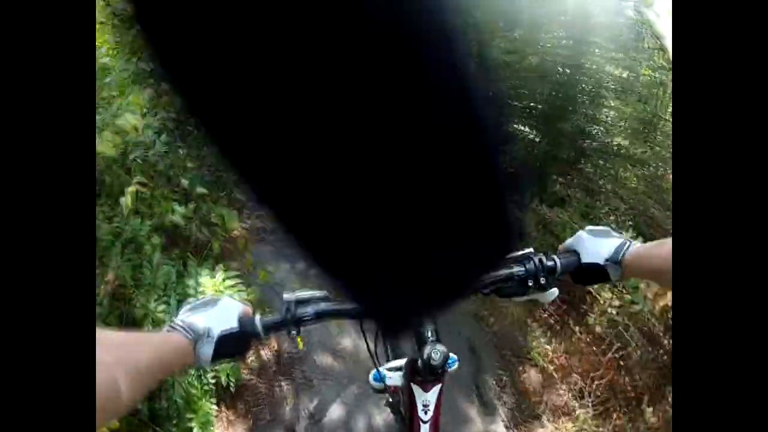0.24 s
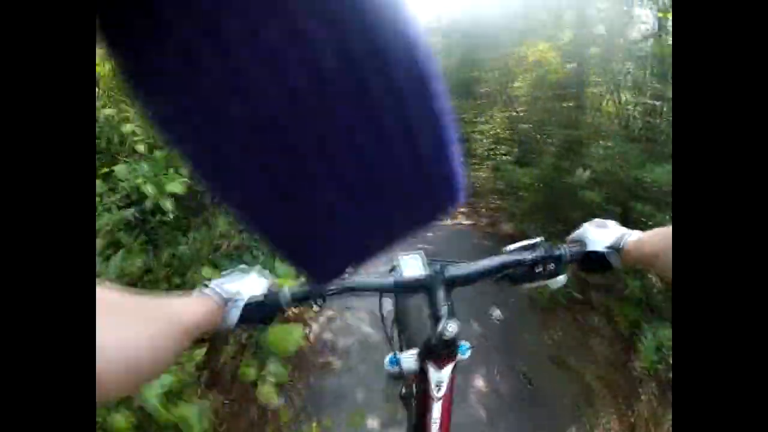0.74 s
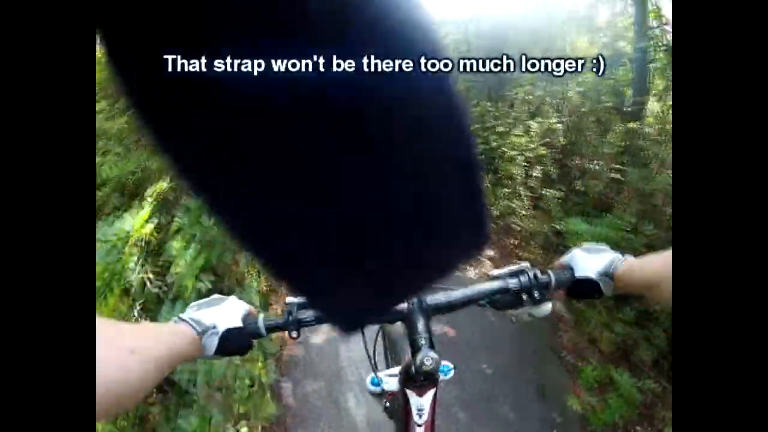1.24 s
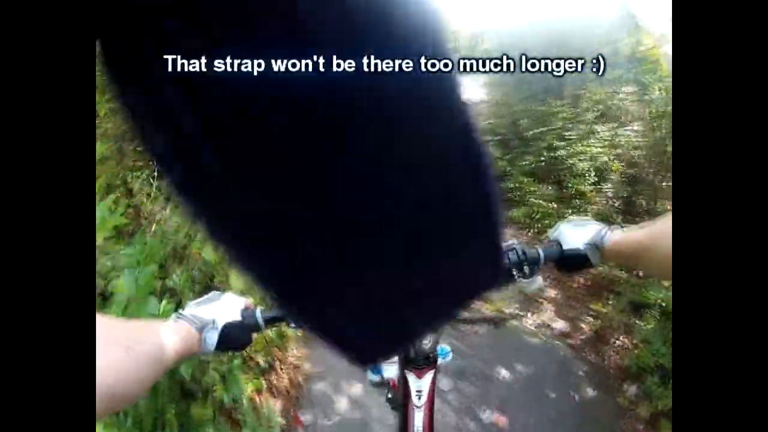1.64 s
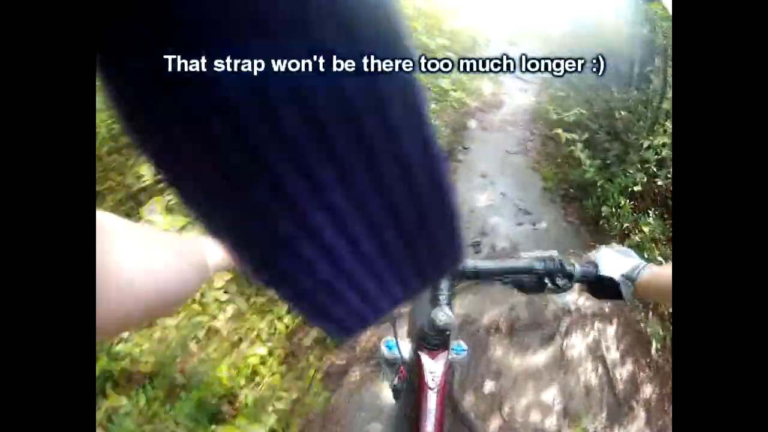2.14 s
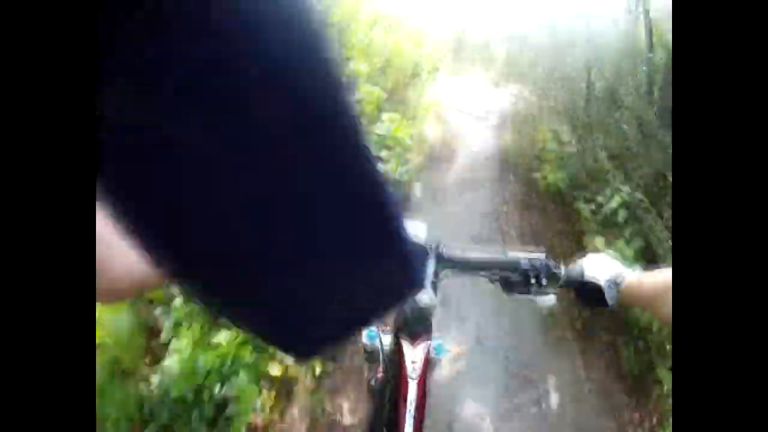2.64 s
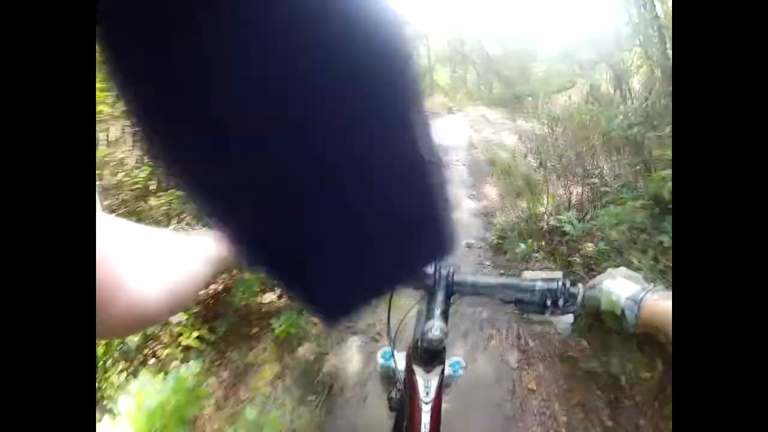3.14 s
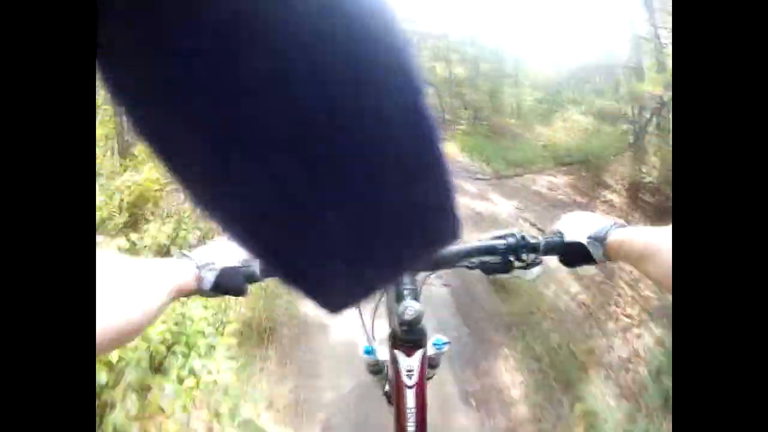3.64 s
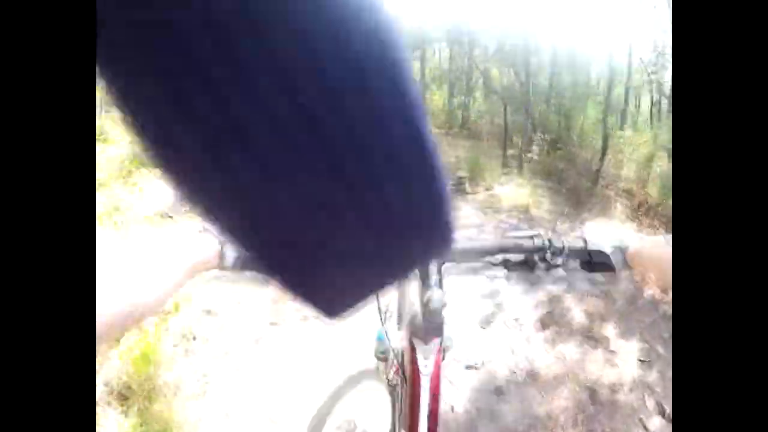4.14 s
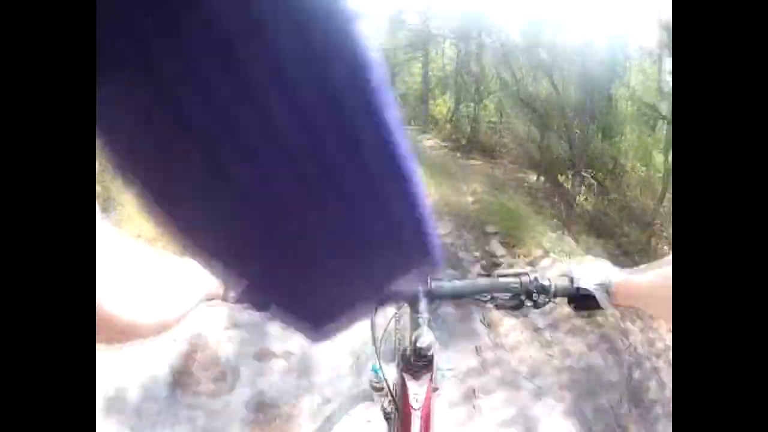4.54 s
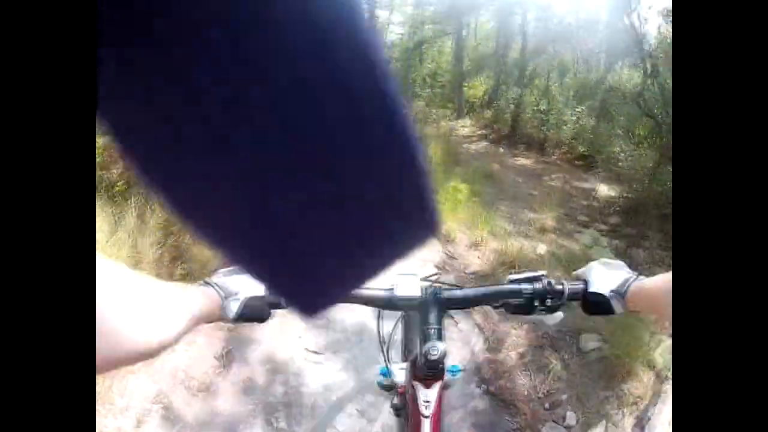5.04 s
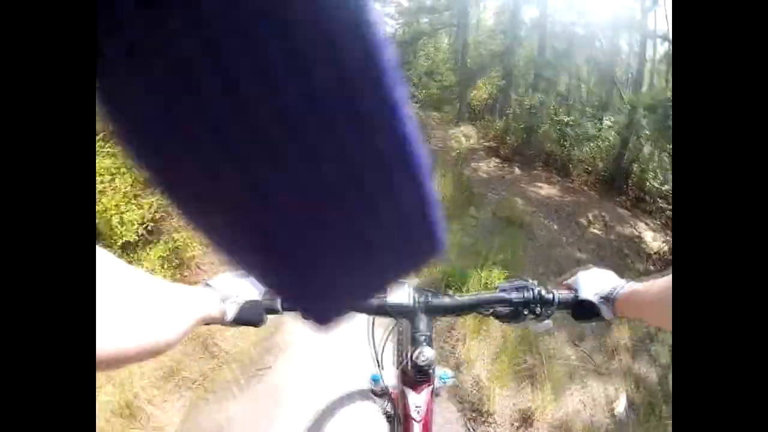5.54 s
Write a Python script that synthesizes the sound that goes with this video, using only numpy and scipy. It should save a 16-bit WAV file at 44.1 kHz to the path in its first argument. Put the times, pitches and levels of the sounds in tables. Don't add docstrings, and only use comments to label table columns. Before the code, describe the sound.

Low tyre rumble and gritty gravel noise under bursts of boxy, overloaded clacks and thuds as a mountain bike jolts downhill.

```python
import sys
import numpy as np
from scipy import signal
from scipy.fft import rfft, irfft
from scipy.io import wavfile
from scipy.ndimage import uniform_filter1d

SR = 44100
rng = np.random.default_rng(int(sys.argv[2]) if len(sys.argv) > 2 else 0)


def output_pcm(signal):
    pcm = np.clip(np.atleast_2d(signal).T, -1, 1) * 32767
    wavfile.write(sys.argv[1], SR, np.round(pcm).astype(np.int16))


def nominal_scale(level):
    x = np.asarray(level, float) / 20
    return 10 ** x


N = 254898


def rms_one(x):
    return x / np.sqrt(np.mean(x ** 2) + 1e-20)


def drift(rate):
    r = np.exp(-40 * np.pi * rate / SR)
    white = rng.standard_normal(N // 20 + 4002)
    slow = signal.lfilter([1], [1, -2 * r, r * r], white)[4000:]
    return np.interp(np.arange(N) / 20, np.arange(len(slow)), rms_one(slow))


def clicks_at(times, heights):
    clicks = np.zeros(N)
    clicks[(np.asarray(times) * SR).astype(int)] = heights
    return clicks


def die_away(kicks, t60, smooth):
    tail = signal.lfilter([1], [1, -nominal_scale(-60 / (t60 * SR))], kicks + 1e-18)
    return uniform_filter1d(tail, size=smooth)


def ring(x, hz, t60):
    r, w = nominal_scale(-60 / (t60 * SR)), 2 * np.pi * hz / SR
    return signal.lfilter([0, np.sin(w)], [1, -2 * r * np.cos(w), r * r], x + 1e-18)


def strike(times, heights, modes, contact_hz):
    soft = np.exp(-2 * np.pi * contact_hz / SR)
    clicks = clicks_at(times, heights) + 1e-18
    clicks = signal.lfilter([(1 - soft) ** 2], [1, -2 * soft, soft * soft], clicks)
    return sum(nominal_scale(level_db) * sign * ring(clicks, hz, t60) for hz, level_db, t60, sign in modes)


def lumpy(spectrum, low_hz, count, lump_db, lump_rate):
    out, shared, white = 0, drift(lump_rate), rng.standard_normal((2, N))
    hz, level = np.transpose(spectrum)
    for k in range(count):
        low = low_hz * 2 ** (k / 2)
        band_filter = signal.butter(2, [low, low * np.sqrt(2)], "band", fs=SR, output="sos")
        band = signal.sosfilt(band_filter, white[k % 2])
        level_db = np.interp(np.log(low * 1.128), np.log(hz), level)
        swell_db = lump_db * (shared + .5 * drift(lump_rate))
        out = out + band * nominal_scale(level_db + swell_db)
    return rms_one(out)


# start_s, length_s, level_db
GROUND_PATCHES = [(0.069, 0.025, 4), (0.35, 0.053, -3), (.46, 0.028, 6), (0.57, 0.051, 5),
                  (0.69, 0.092, 5.5), (0.803, 0.036, -6.5), (0.825, 0.044, 6), (0.905, .12, -1.5),
                  (1.068, 0.043, 9.5), (1.59, 0.032, -6), (1.816, 0.054, 3), (2.651, .19, -4.5),
                  (2.895, 0.18, 6), (3.186, 0.035, -6), (3.369, 0.038, -4.5), (3.563, 0.075, -4.5),
                  (3.7, .2, -4), (4.002, 0.192, 5), (4.222, 0.13, -5), (4.52, 0.076, -7),
                  (4.595, 0.038, -7.5), (4.644, 0.1, -3), (1.984, 0.143, 3.5), (4.76, 0.084, -3),
                  (4.994, 0.019, -8), (5.029, 0.038, 3), (5.143, 0.065, -6.5), (5.522, 0.057, -5.5)]


def patches():
    t, edge_s = np.arange(N) / SR, 0.0074
    change_db = np.zeros(N)
    for start, length, db in GROUND_PATCHES:
        inside = np.minimum(t - start, start + length - t)
        change_db += db * np.clip(inside / edge_s + .5, 0, 1)
    return change_db


# time_s, tyre_load_db (rumble), gravel_looseness_db (grit)
TRAIL = [(0.0, -33, -44), (0.32, -37, -49), (0.61, -33, -46), (0.85, -43, -48), (1.8, -39, -49.5),
         (2.04, -41.5, -49.5), (2.3, -33.5, -40.5), (2.45, -28, -37.5), (2.74, -30.5, -37.5),
         (3.09, -27.5, -44), (3.2, -28, -41.5), (3.64, -38, -42.5), (3.94, -31.5, -44.5), (4.3, -32.5, -40),
         (4.49, -25.5, -36.5), (4.89, -33.5, -43), (5.09, -29.5, -43.5), (5.78, -37.5, -48)]


def trail():
    s, load, gravel = np.transpose(TRAIL)
    t, patch_db = np.arange(N) / SR, patches()
    return np.interp(t, s, load) + 0.55 * patch_db, np.interp(t, s, gravel) + patch_db


# pitch_hz, level_db (per Hz)
RUMBLE_SPECTRUM = [(12, -29), (20, 6), (43, -4.5), (102, -6.5), (205, -18.5), (250, -17), (320, -40),
                   (550, -120)]


def rumble(load_db):
    thud_db = np.array(CASE_KNOCKS)[:, 2]
    bounce = after_knock(nominal_scale(thud_db - 17), delay_s=0.0033, t60=0.22)
    level = np.hypot(nominal_scale(load_db + 4), bounce)
    return level * lumpy(RUMBLE_SPECTRUM, 22.84, count=7, lump_db=2.5, lump_rate=10.2)


# pitch_hz, level_db (per Hz)
SHUDDER_SPECTRUM = [(120, -32), (200, 0.5), (239, -3.5), (410, -9), (471, -6), (750, -15.5), (980, -41),
                    (1650, -120)]


def shudder(load_db, gravel_db):
    level_db = -43.5 + 0.36 * (load_db - load_db.mean()) + 0.48 * (gravel_db - gravel_db.mean())
    return nominal_scale(level_db) * lumpy(SHUDDER_SPECTRUM, 191.2, count=4, lump_db=3.5, lump_rate=14)


# pitch_hz, width_hz, level_db
CASE_RESONANCES = [(855, 62, 3), (1033, 138, 3), (1360, 115, -4), (1792, 314, 5), (2036, 600, 7),
                   (2394, 390, 1.5), (2810, 980, -4.5), (3370, 840, -3), (3705, 183, -2.5),
                   (4450, 510, -28), (5030, 260, -15)]


def grit(per_s, spread_db, clump_db, hiss):
    sizes = nominal_scale(spread_db * np.minimum(rng.exponential(1, (2, N)), 5)) * rng.choice([-1, 1], (2, N))
    clumps = nominal_scale(clump_db * (0.073 * drift(42) + drift(32)))
    hits = rng.random((2, N)) < per_s / SR
    grains = (rms_one(sizes * hits) + hiss * rng.standard_normal((2, N))) * clumps
    out = 0
    for k, (hz, width, level_db) in enumerate(CASE_RESONANCES):
        r = np.exp(-np.pi * width / SR)
        poles = [1, -2 * r * np.cos(2 * np.pi * hz / SR), r * r]
        peak = signal.lfilter([1 - r * r, 0, r * r - 1], poles, grains[k // 3 % 2])
        out = out + (-1) ** k * nominal_scale(level_db + 1.66 * drift(19.6)) * peak
    return rms_one(out)


def stones(gravel_db):
    hush_db = -4 * after_knock(0.9, delay_s=0.0081, t60=0.028 * np.log(1000))
    shaken = np.hypot(nominal_scale(gravel_db + 2.5 + hush_db), aftershake(t60=0.025, share_db=-10))
    return shaken * grit(1500, spread_db=3.5, clump_db=1.66, hiss=0.74)


def haze(level_db, top_db):
    white = rng.standard_normal((2, N))
    body = signal.sosfilt(signal.butter(1, [700, 3000], "band", fs=SR, output="sos"), white[0])
    top = signal.sosfilt(signal.butter(2, [4000, 5600], "band", fs=SR, output="sos"), white[1])
    return nominal_scale(level_db) * rms_one(body) + nominal_scale(top_db) * rms_one(top)


# start_s, level_db
CHAIN_TICKS = [(.011, -26), (.061, -35), (.258, -31.5), (.398, -32.5), (.499, -25.5), (.517, -26.5),
               (1.273, -31), (1.362, -29), (1.435, -23), (1.501, -31), (1.733, -38), (1.812, -37),
               (2.221, -33.5), (2.477, -25), (2.946, -20), (3.159, -24), (3.358, -26), (3.431, -24),
               (4.535, -31), (4.697, -33), (4.736, -26), (4.741, -21), (4.832, -25.5), (4.886, -29),
               (5.056, -28), (5.504, -30.5), (5.698, -32)]
# start_s, level_db
CHEST_THUMPS = [(.463, -22.5), (.48, -22.5), (2.008, -31), (2.069, -17.5), (2.117, -24), (2.351, -11),
                (2.591, -8), (2.693, -28), (2.728, -27), (2.807, -17), (2.927, -15), (2.903, -18),
                (2.939, -9), (2.967, -8), (3.036, -20.5), (3.067, -24), (3.129, -17.5), (3.171, -21.5),
                (3.33, -21.5), (3.465, -19.5), (3.5, -26), (3.51, -20), (3.856, -23), (4.189, -24),
                (4.472, -13), (4.635, -21), (4.934, -15.5), (5.036, -20), (5.218, -21), (5.373, -18)]
# start_s, level_db
LATCH_CLACKS = [(.849, -35), (.891, -34.5), (1.413, -37), (2.39, -30), (2.413, -27), (2.421, -19.5),
                (2.505, -14.5), (3.649, -26.5), (3.698, -35.5), (3.767, -32.5), (3.882, -32), (3.951, -34),
                (4.076, -21), (4.144, -15), (5.307, -34.5)]
# start_s, dull_db, hollow_db, bright_db
MOUNT_SLAPS = [(1.083, -30, -26.5, -28.5), (2.261, -13.5, -30, -22), (2.343, -13, -29, -20),
               (2.45, -29, -36, -16), (2.459, -9, -4, -8), (2.512, -11, 3, 0), (2.522, -2, -12.5, -34),
               (2.562, -12, -22, -21), (2.626, -15.5, -20, -20.5), (2.874, -10.5, -20, -21),
               (2.953, -12, -6, 9.5), (2.997, -11.5, -16.5, -17), (3.016, -28, -17.5, -13.5),
               (3.098, -24, -23, -20.5), (3.11, -26, -22.5, -25.5), (3.152, -6, -22.5, -23),
               (3.275, -16, -39, -26), (4.014, -19, -26, -31), (4.041, -8, -22, -25.5),
               (4.05, -10, -36, -20), (4.087, -25, -19, -26), (4.094, -13.5, -23, -15.5),
               (4.103, -20, -23, -17), (4.156, -10, -37, -26), (4.376, -5.5, -28, -19),
               (4.424, -16, -27, -22), (4.435, -35, -17, -19), (4.449, -23, -31, -25),
               (4.922, -13.5, -44, -21), (4.977, -10.5, -15, -4.5)]


def all_taps():
    mixes = ((CHEST_THUMPS, (0.1, -18, -15.5)), (LATCH_CLACKS, (-5, 0.1, -8)), (CHAIN_TICKS, (-8.5, -11.5, 0.1)))
    parts = [np.array(rows)[:, [0, 1, 1, 1]] + [0, *mix] for rows, mix in mixes]
    s, dull, hollow, bright = np.vstack([MOUNT_SLAPS, *parts]).T
    force_db = 3 + 0.13 * dull + 0.77 * bright
    return s, force_db, dull, hollow, bright


# pitch_hz, level_db, t60_s
TAP_VOICES = [
    [(287, 3, 0.0084), (530, -2, 0.0064)],
    [(1036, -3, 0.02), (916, -3, 0.013), (1288, -4.5, 0.012)],
    [(1938, 3.5, 0.0057), (2445, -12.5, 0.014), (3280, -22.5, 0.018)],
]
# pitch_hz, level_db, t60_s, sign
TAP_EDGE = [(4400, -13.5, 0.0026, 0.78), (5300, -15, 0.0027, -1)]


def taps():
    s, force_db, *voices = all_taps()
    chance, bounce, out = rng.standard_normal((len(s), 21)), rng.random((len(s), 2)), 0
    loose = np.clip(-(force_db + 6) / 16, .03, 1)
    for v, (level, modes) in enumerate(zip(voices, TAP_VOICES)):
        sign = np.sign(chance[:, 9 + v]) if v else -1
        for k, (hz, mode_db, t60) in enumerate(modes):
            height = nominal_scale(level + 2.5 + mode_db + 0.54 * chance[:, 3 * v + k])
            clicks = clicks_at(s, height * sign)
            for b in range(2):
                late = ((s + 0.001006 + .007 * bounce[:, b]) * SR).astype(int)
                clicks[late] += 0.63 * height * loose * chance[:, 12 + (3 * v + k + 4 * b) % 9]
            if v == 0:
                clicks = signal.lfilter(*signal.butter(1, 1210, fs=SR), clicks + 1e-18)
            even = 2 * np.e * np.log(1000) / (t60 * 1.112 * SR)
            out = out + even * ring(ring(clicks, hz, t60 * 0.64), hz, t60 * 0.64)
    return out + strike(s, nominal_scale(voices[2]), TAP_EDGE, 9000)


# start_s, peak_db, pitch_hz
ROOT_JOLTS = [(0.395, -23.5, 136), (1.662, -33, 60), (2.122, -25, 176), (2.259, -19, 131),
              (2.352, -17.5, 172), (2.461, -13.5, 111), (2.51, -12.5, 133), (2.534, -17, 76.5),
              (2.608, -16, 110), (2.639, -16.5, 125), (2.804, -21, 250), (2.866, -12.5, 111),
              (2.894, -16.5, 61.9), (2.964, -7, 94), (2.979, -9, 94), (3.003, -9, 126), (3.032, -15.5, 70),
              (3.151, -16.5, 151), (3.486, -24.5, 66.5), (3.851, -27.5, 136), (4.032, -16.5, 63),
              (4.049, -17, 147), (4.09, -13.5, 95), (4.154, -14.5, 129), (4.169, -19.5, 103),
              (4.375, -20, 157), (4.429, -15.5, 98), (4.842, -24, 62.4), (5.047, -28, 61.9),
              (5.213, -22, 129)]


def jolts():
    out, t = np.zeros(N), np.arange(SR // 10) / SR
    for (s, peak_db, hz), sign in zip(ROOT_JOLTS, rng.choice([-1, 1], len(ROOT_JOLTS))):
        swell = t * hz * 1.7 * np.exp(1 - t * hz * 1.364)
        i = int(s * SR)
        out[i:i + len(t)] += sign * nominal_scale(peak_db) * swell * np.sin(2 * np.pi * hz * t)
    return out


# start_s, blow_db, thud_db, ring_db, crack_db
CASE_KNOCKS = [(0.6663, 16, -0.5, 2.5, 5), (1.0441, 0, -9, -10.5, -18.5), (2.2974, 12.5, 3, 1, 4),
               (2.5799, 9.5, 3.5, 0, -2), (3.2534, 7.5, 2, -3, -6), (4.1328, 8, 3.5, -2.5, -8),
               (4.3893, 10, 5, -0.5, -6), (4.4842, 2.5, -4, -7.5, -15), (4.5834, 11, 6.5, 1, -1.5),
               (4.9567, 14.5, 4, 4, 8), (5.3416, 9, 3.5, -0.5, -2)]
# pitch_hz, level_db, t60_s, sign
THUD_MODES = [(88, 3.6, .033, 1), (170, -14, .08, -1)]
BLOW_MODES = [(328, 15.6, .003, -1), (604, 4.7, .0104, 1), (1160, -6, .006, 1),
              (1474, -12.5, 0.018, -0.39), (1938, -14.5, 0.017, 1), (3404, -23, 0.012, 0.5)]
WALL_MODES = [(711, -2.4, .034, 1)]
CRACK_MODES = [(940, 13, 0.0015, -0.93), (1600, 0.5, 0.011, 0.2), (3780, -2.5, 0.0047, -1.08)]


def knocks():
    s, blow, thud, wall, crack = np.transpose(CASE_KNOCKS)
    rebound_s, rattle_s = .00136, .0020
    body = strike(s, nominal_scale(blow), BLOW_MODES, 6000) + strike(s, nominal_scale(thud), THUD_MODES, 6000)
    lift_off = strike(s + rebound_s, nominal_scale(wall), WALL_MODES, 6000)
    return body + lift_off + strike(s + rattle_s, nominal_scale(crack), CRACK_MODES, 6000)


def after_knock(levels, delay_s, t60):
    return die_away(clicks_at(np.array(CASE_KNOCKS)[:, 0] + delay_s, levels), t60, smooth=200)


def aftershake(t60, share_db):
    s, force_db = all_taps()[:2]
    kicks = clicks_at(s, nominal_scale(np.minimum(force_db, -8) + share_db))
    knock_s, _, thud_db = np.array(CASE_KNOCKS)[:, :3].T
    kicks[(knock_s * SR).astype(int) + 150] = nominal_scale(thud_db - 29.5)
    return die_away(kicks, t60, smooth=130)


def scene():
    load_db, gravel_db = trail()
    riding = rumble(load_db) + shudder(load_db, gravel_db) + stones(gravel_db)
    riding = riding + haze(level_db=-56.5, top_db=-67.5)
    return np.tile(riding + taps() + jolts() + knocks(), (2, 1))


def top_gate(x, low_hz, high_hz, open_db, size):
    spectrum, hz = rfft(x), np.fft.rfftfreq(N, 1 / SR)
    band = irfft(spectrum * ((hz > low_hz) & (hz < high_hz)), N)
    frames = np.pad(band, (0, -N % size)).reshape(-1, size)
    quiet = np.sqrt(np.mean(frames ** 2, axis=1)) < nominal_scale(open_db)
    shut = np.repeat(quiet, size)[:N]
    return x - band * uniform_filter1d(shut * 1., size=size // 4)


def roll_off(x):
    return signal.sosfilt(signal.butter(12, 15950, fs=SR, output="sos"), x)


def record(dry):
    capsule = signal.sosfilt(signal.butter(1, 36, "high", fs=SR, output="sos"), dry[0])
    slow = np.clip(signal.resample_poly(capsule, 40, 147), -1, 1)
    held = signal.resample_poly(np.repeat(slow, 4), 147, 160)[:N]
    held = np.pad(held, (0, N - len(held)))
    held = top_gate(held, 14400, 15300, open_db=-65.5, size=940)
    held = top_gate(held, 16100, 23000, open_db=-30, size=64)
    held = top_gate(held, 15060, 23000, open_db=-30, size=118)
    unlike = held * nominal_scale(-33) * drift(300)
    return roll_off(np.clip(held + unlike * [[1], [-1]], -1, 1))


dry = scene()
out = record(dry)
output_pcm(out)
```